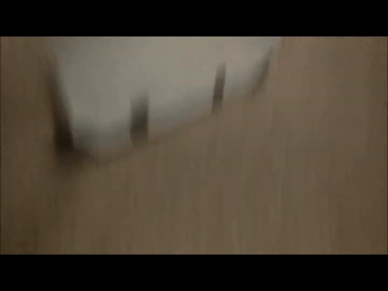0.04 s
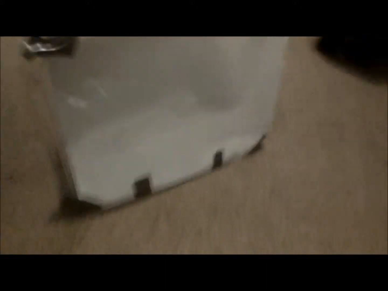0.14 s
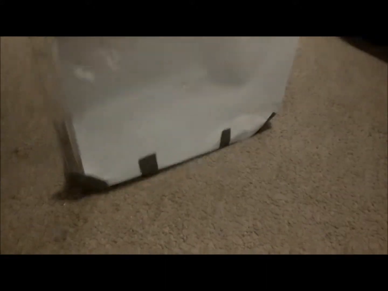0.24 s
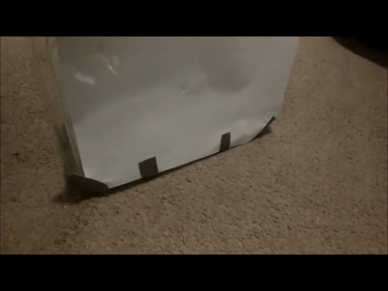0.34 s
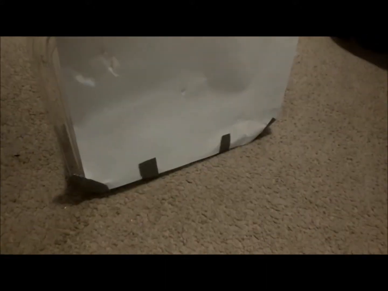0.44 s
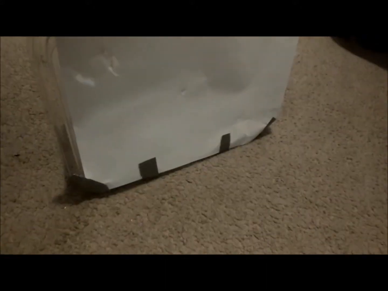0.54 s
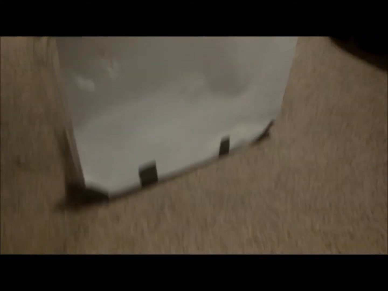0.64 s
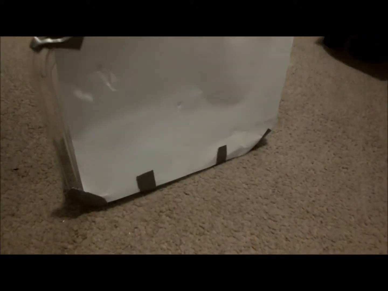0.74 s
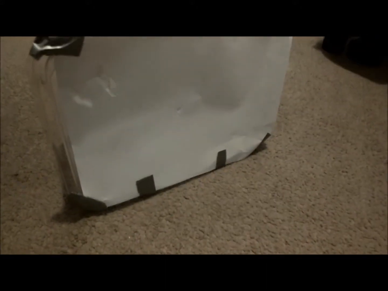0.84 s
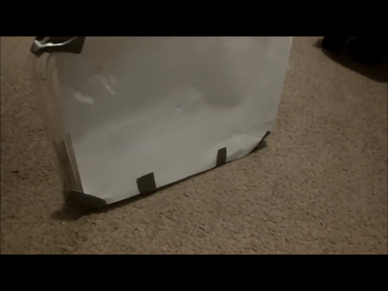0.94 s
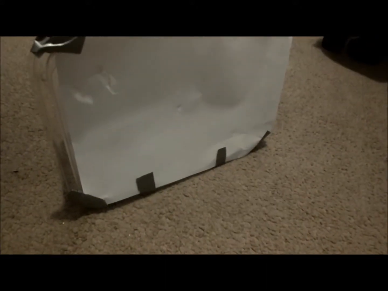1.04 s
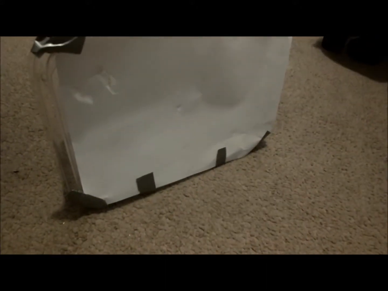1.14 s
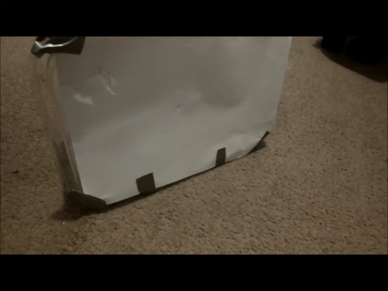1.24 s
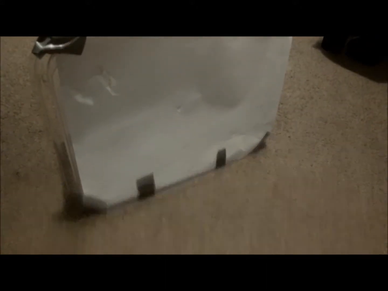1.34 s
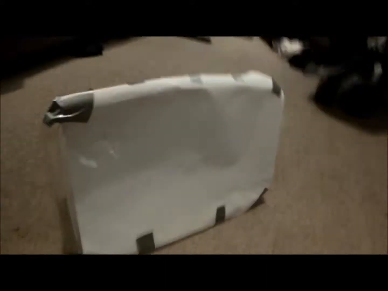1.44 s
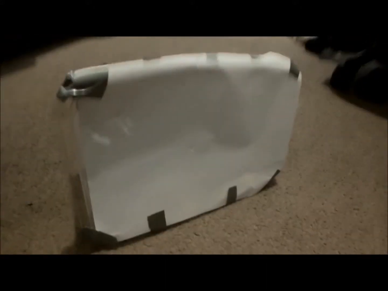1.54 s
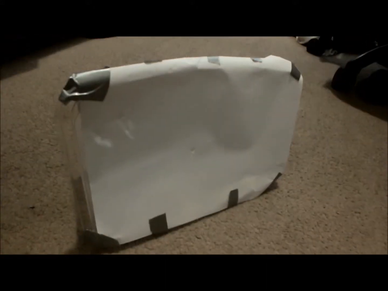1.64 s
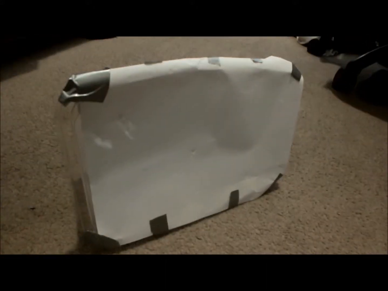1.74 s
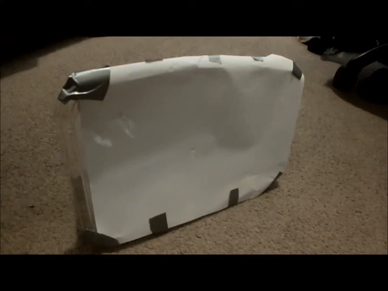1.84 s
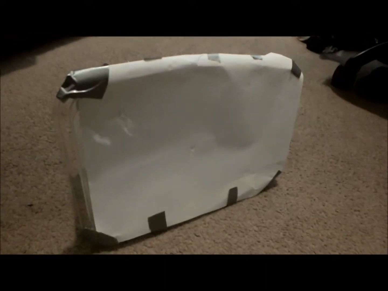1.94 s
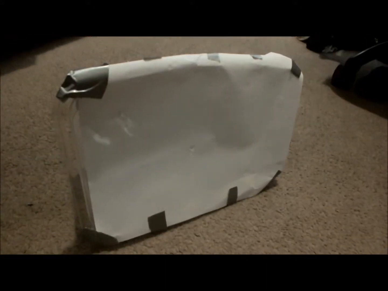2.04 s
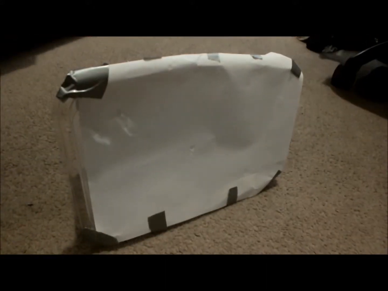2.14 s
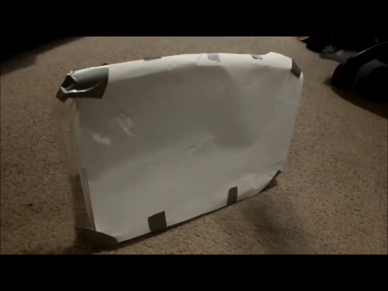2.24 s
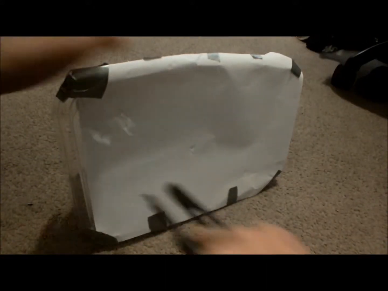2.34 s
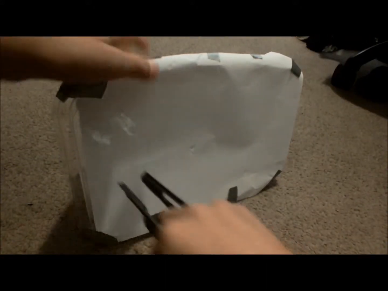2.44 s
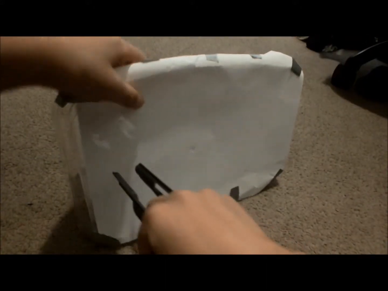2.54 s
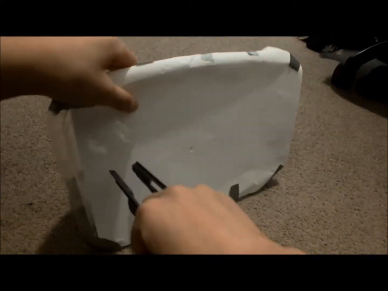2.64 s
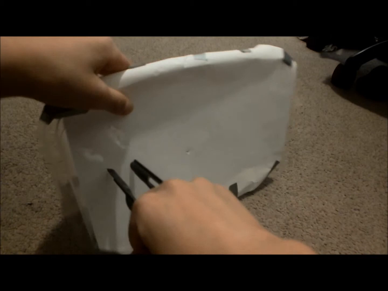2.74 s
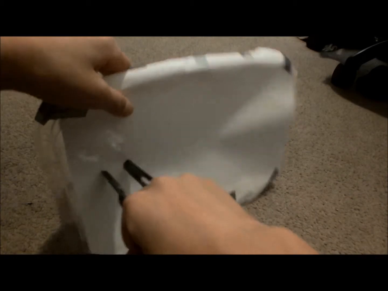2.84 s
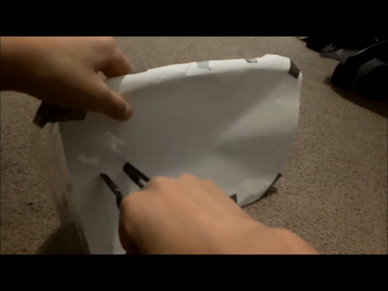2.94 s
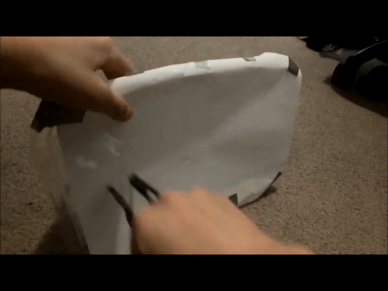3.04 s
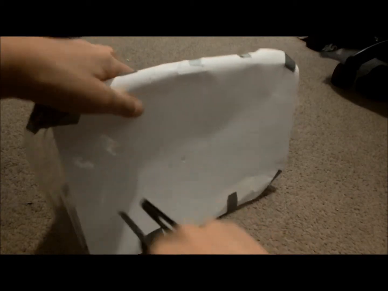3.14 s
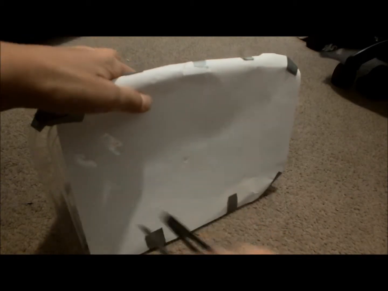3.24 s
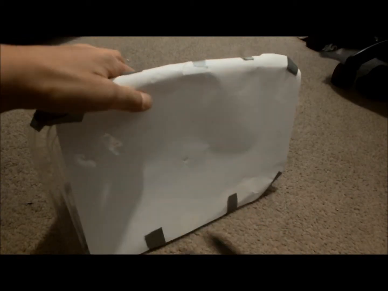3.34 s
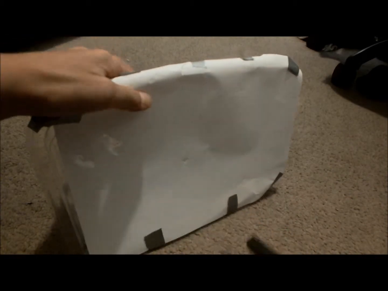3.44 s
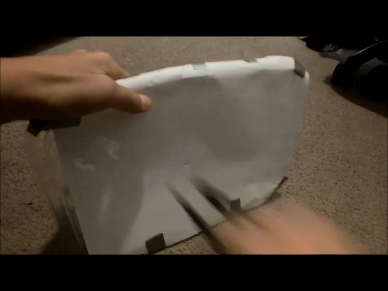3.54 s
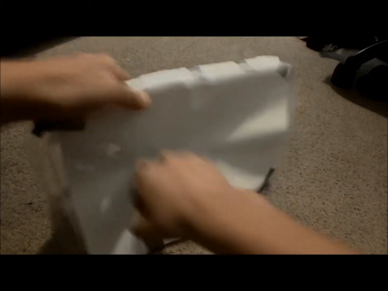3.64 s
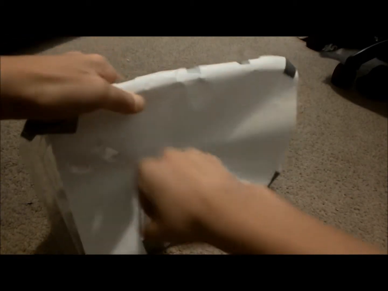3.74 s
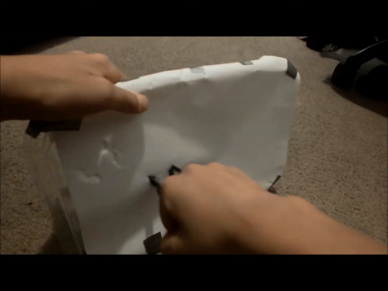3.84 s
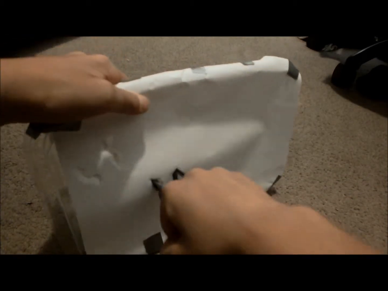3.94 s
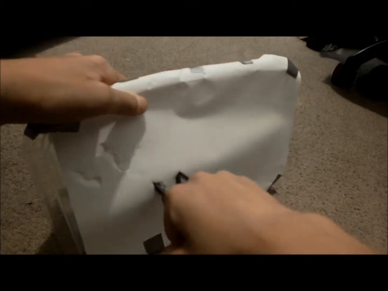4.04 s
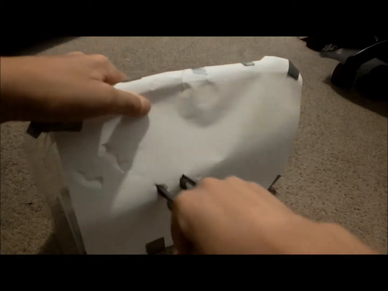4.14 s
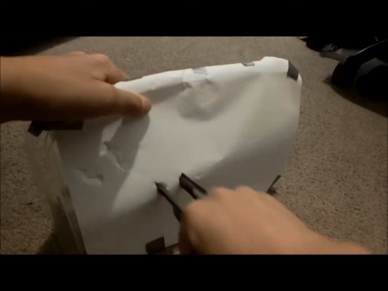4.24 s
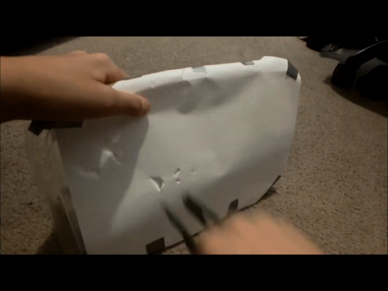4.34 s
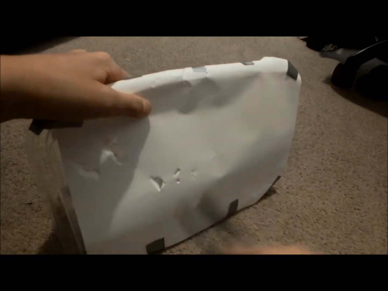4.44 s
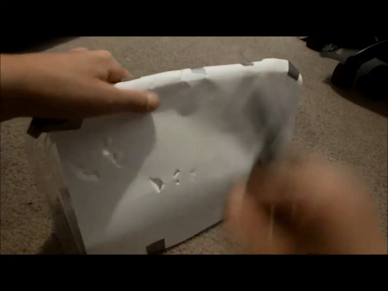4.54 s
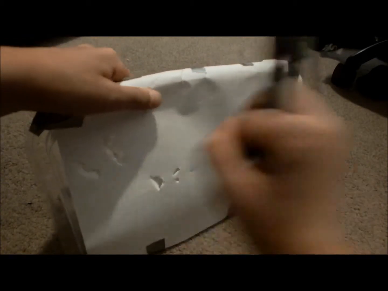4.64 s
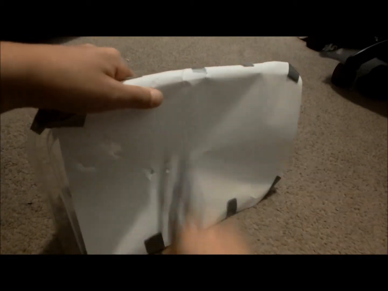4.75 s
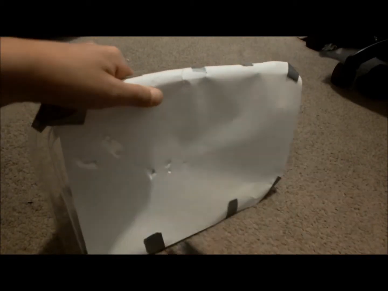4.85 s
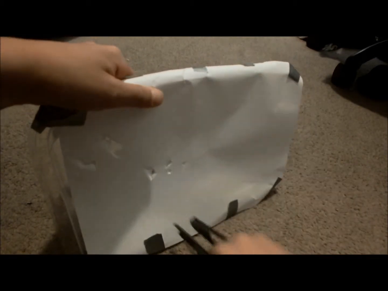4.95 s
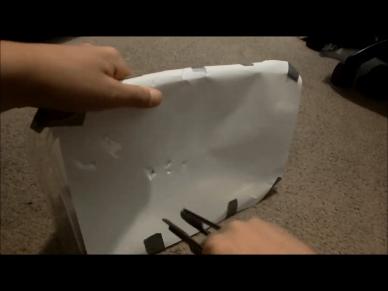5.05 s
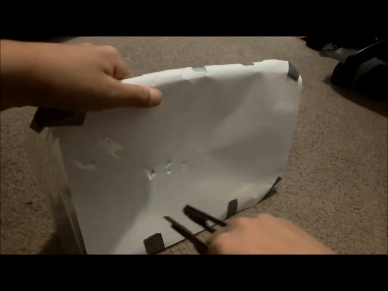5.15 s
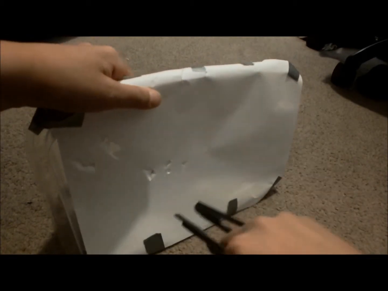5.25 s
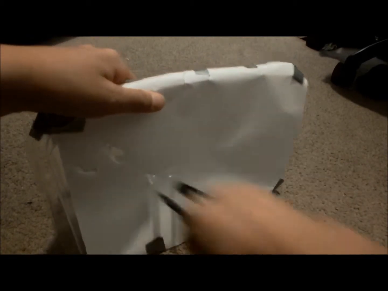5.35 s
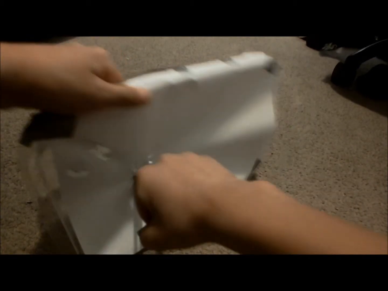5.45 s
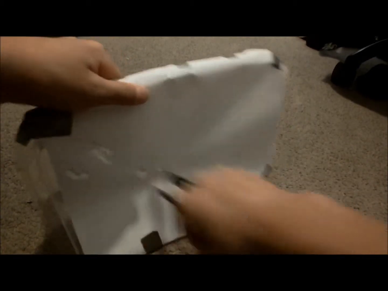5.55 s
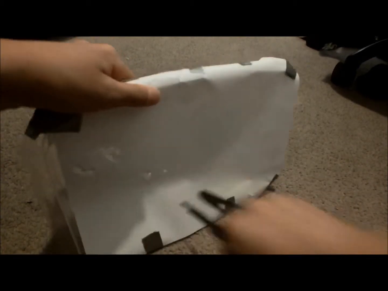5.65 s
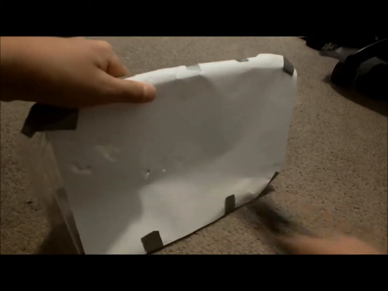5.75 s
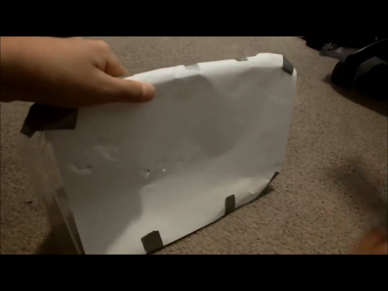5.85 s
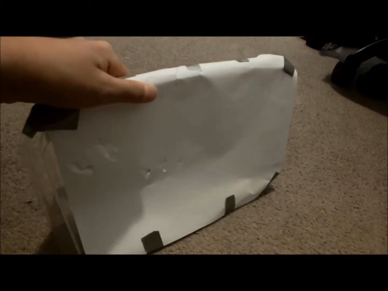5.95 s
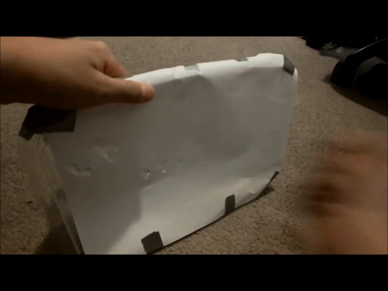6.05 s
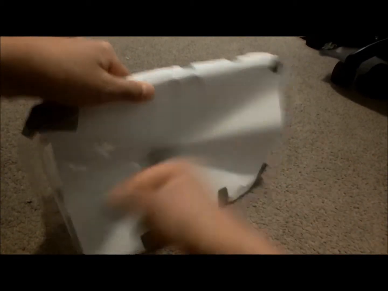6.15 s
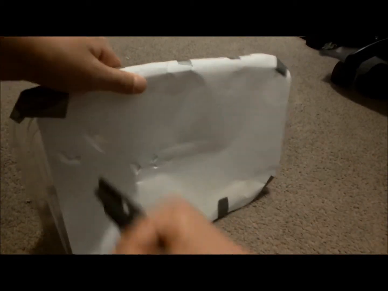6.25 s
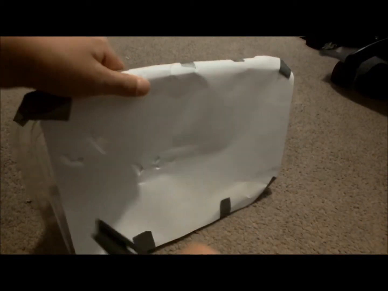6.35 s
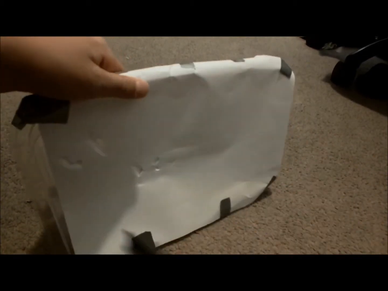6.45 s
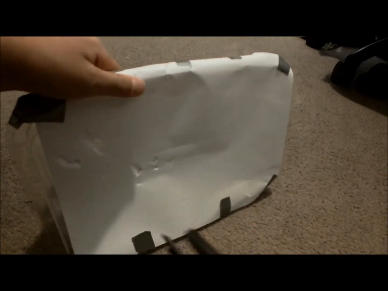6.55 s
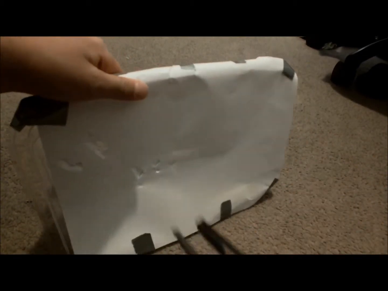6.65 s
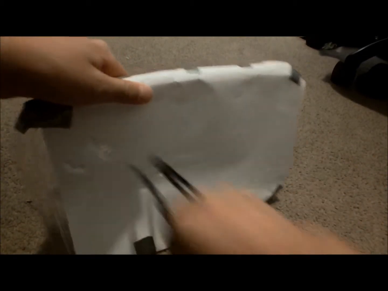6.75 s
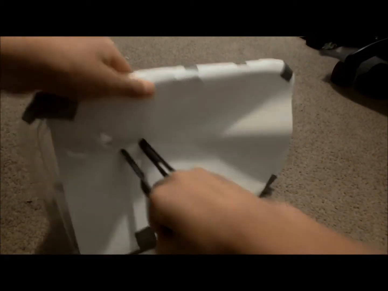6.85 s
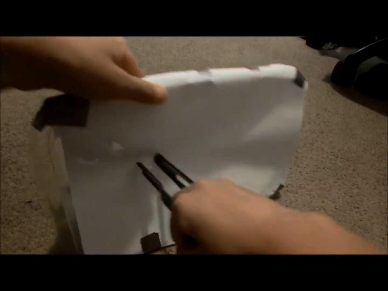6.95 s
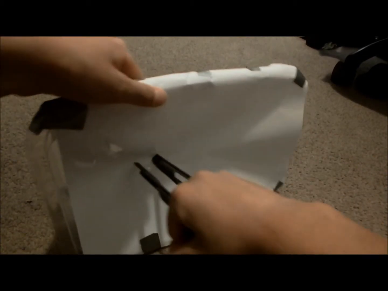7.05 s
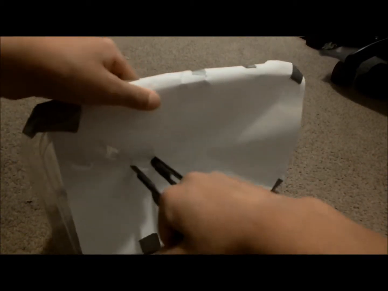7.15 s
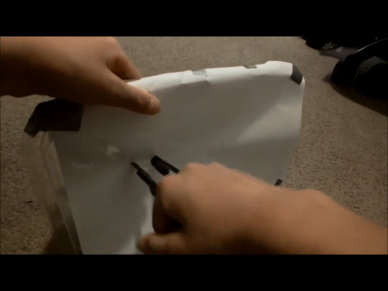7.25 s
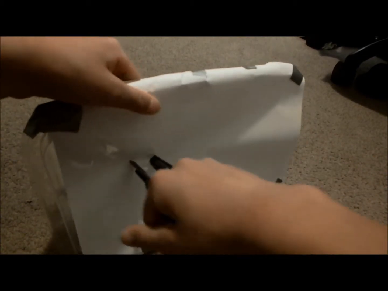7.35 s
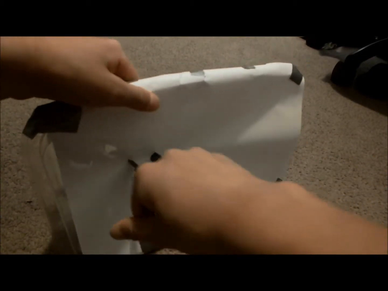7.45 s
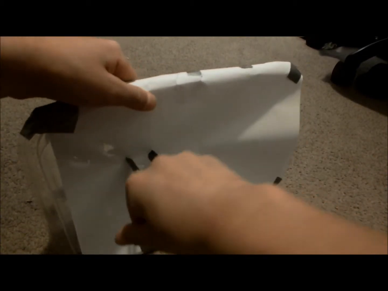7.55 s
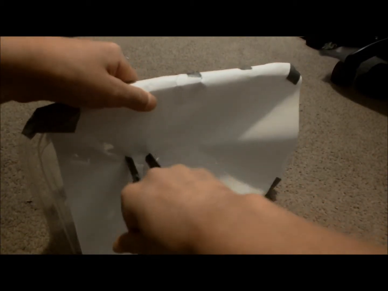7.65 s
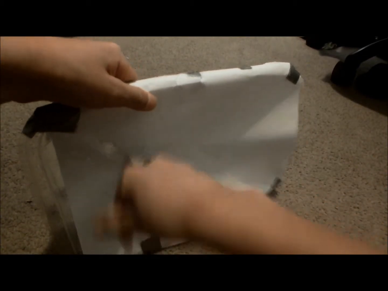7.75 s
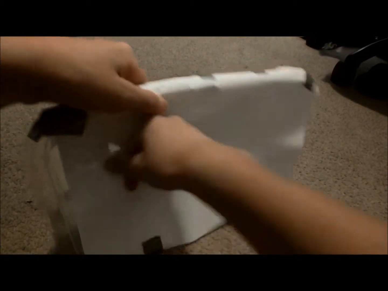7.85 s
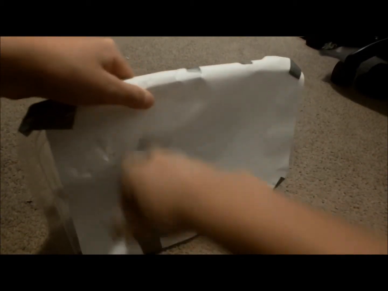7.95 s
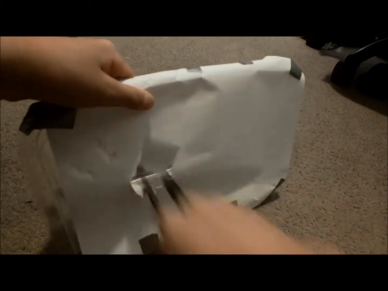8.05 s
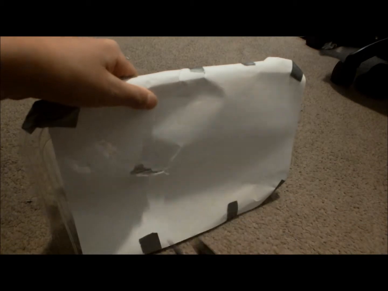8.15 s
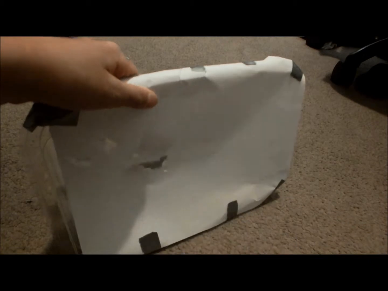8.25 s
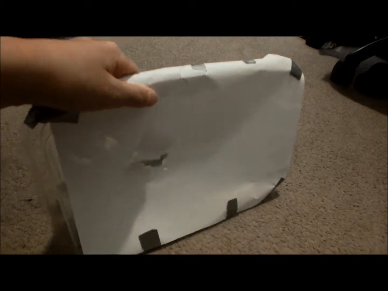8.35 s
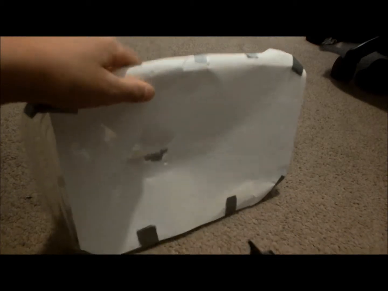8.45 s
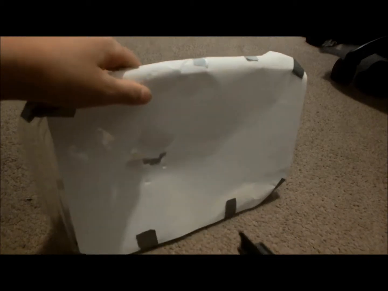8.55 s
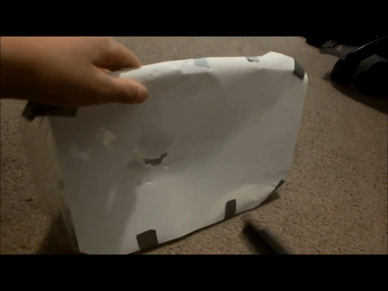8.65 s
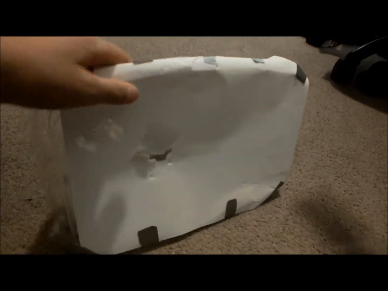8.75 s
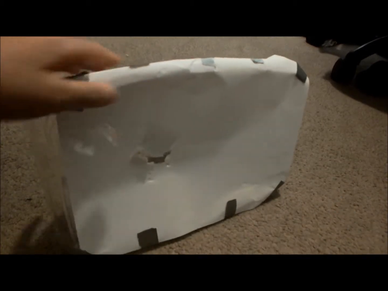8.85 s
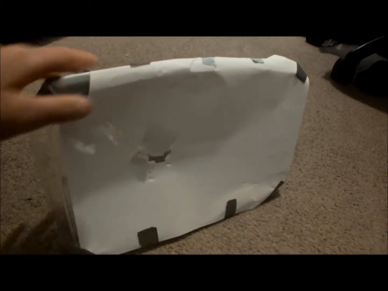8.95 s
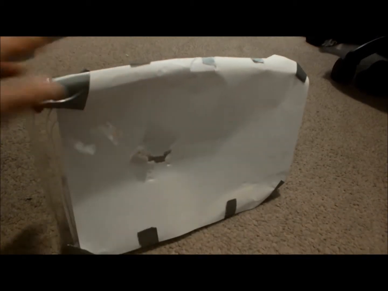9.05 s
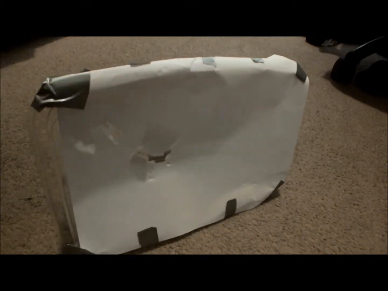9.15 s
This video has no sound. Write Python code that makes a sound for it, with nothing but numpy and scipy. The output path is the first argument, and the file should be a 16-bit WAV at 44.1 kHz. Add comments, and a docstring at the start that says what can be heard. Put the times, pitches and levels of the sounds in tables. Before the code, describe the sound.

Close, dry paper stabs: loud snapping punctures, short raspy tears and crinkles with a hollow boxy thump, after a few bumps on the camera.

```python
"""Toy blade stabbing a paper-covered box

A two-pronged toy blade stabs a sheet of paper taped over a hollow plastic box, close to a hand-held camera
in a carpeted room. Shaped pulses and noise snap as the taut sheet dents and bursts; random slips rasp as
fibres give way and the blade slides in and out; the sheet's sound rings the box modes.
Before that, pulses, ticks and damped thuds knock the camera about as it is set in place. Steady hiss below."""
import sys
import numpy as np
from scipy import signal
from scipy.fft import rfft, irfft, next_fast_len
from scipy.io import wavfile
from scipy.ndimage import uniform_filter1d

SR = 44100
rng = np.random.default_rng(int(sys.argv[2]) if len(sys.argv) > 2 else 0)


def put_to_file(sound):
    """Save the sound as 16-bit audio at rate SR, in the file named by the first command-line argument."""
    columns = np.atleast_2d(sound).T  # one column per channel
    safe = np.clip(columns, -1, 1)
    whole_steps = np.round(safe * 32767)
    wavfile.write(sys.argv[1], SR, whole_steps.astype(np.int16))


N = 406161
TIME_S = np.arange(N) / SR

# Colour of the steady hiss. Each row: frequency in Hz, relative level in dB.
HISS_COLOUR = [(15, -65), (25, -21), (76, -5.5), (102, -4), (190, 0.5), (394, -2.5), (516, -2.5), (624, -3),
               (1130, -6.5), (1940, -7.5), (3340, -9), (3620, -5), (4250, -11), (6380, -17.5), (16000, -27)]
# Narrow bands in the hiss. Each row: frequency in Hz, width in Hz, level in dB.
WHINE_BANDS = [(182.5, 5.1, -76), (2950, 250, -73), (3570, 61, -70), (6230, 180, -71), (6800, 200, -71.5),
               (7980, 120, -77)]
# Fingers shifting on the camera body. Each row: time in seconds, level in dB.
HANDLING_LEVEL = [(0, -66), (.04, -51), (.05, -33.5), (.11, -46), (.24, -56.5), (.36, -53.5), (1.36, -68),
                  (1.42, -59), (1.68, -60), (1.82, -50.5), (1.92, -62)]
# Colour of the skin ticks. Each row: frequency in Hz, relative level in dB.
GRIP_COLOUR = [(25, 1), (200, 3), (1200, -2.5), (3500, -9.5), (12000, -28)]
# Knocks and ticks on the camera body. Each row: start in seconds, level in dB, crest in Hz,
# slope going down from the crest in dB/octave, ring t60 in seconds.
KNOCKS = [(.0055, -32.5, 2220, 0, 0.038), (0.0419, -18, 1200, -6.5, 0.029), (.0927, -31, 2500, -0.5, 0.04),
          (.158, -42.5, 3000, -1, 0.038), (0.1805, -41, 3320, -6, 0.026), (0.2081, -35.5, 2650, -4, 0.031),
          (0.238, -36.5, 2900, 3.5, 0.03), (0.2893, -40, 865, 0.5, 0.042), (0.701, -32.5, 3850, -2, 0.017),
          (0.9265, -46, 1250, 2.5, 0.059), (1.3723, -17.5, 1550, -0.9, 0.037),
          (1.4491, -32, 5130, -3, 0.021), (1.4681, -41, 1030, -7, .05), (1.519, -36, 3540, -3, 0.045),
          (1.611, -43.5, 716, 3.5, 0.043)]
# Low modes each knock shakes in the camera body. Each row: frequency in Hz, t60 in seconds,
# level in dB relative to the knock.
CAMERA_MODES = [(51.5, 0.12, -15), (158, 0.093, -10.5)]
# Dull thuds of the hand on the camera and of the box as it rocks and springs back.
# Each row: start in seconds, level in dB, pitch in Hz, t60 in seconds.
THUDS = [(.27, -47.5, 211, .31), (.655, -46.5, 45, .35), (.69, -30, 241, 0.048), (1.72, -44, 281, 0.28),
         (1.743, -49, 133, 0.21), (1.813, -47, 284, .12), (1.825, -41.5, 142, 0.16),
         (2.553, -12.5, 302, 0.041), (3.635, -47, 46, 0.21), (3.64, -34, 137, 0.23),
         (4.34, -35, 230, 0.062), (5.469, -38, 102.5, .35), (6.261, -22.5, 264, 0.2),
         (6.848, -26, 131, 0.093), (7.628, -32, 192, 0.22), (8.306, -39, 116, 0.29),
         (8.486, -23.5, 272, 0.25), (8.497, -35, 106, 0.19), (8.497, -18, 572, 0.091)]
# Room decay. Each row: band centre in Hz, t60 in seconds, relative level in dB.
ROOM_BANDS = [(150, 0.47, 0.5), (403, 0.19, -4.5), (1000, 0.17, -2), (2500, 0.19, -1.5), (6000, 0.21, -4),
              (12000, 0.16, 2.5)]
# Air and wall modes of the box. Each row: frequency in Hz, t60 in seconds, level in dB before the box gain.
BOX_MODES = [(110, 0.15, -2.5), (189, 0.069, -3.5), (252.5, 0.055, 0.5), (288.8, 0.2, 5.5),
             (349, 0.081, -9), (416.4, 0.084, -0.5), (571, 0.1, -6.5), (685, 0.15, -9)]
# Sheet denting, buckling and springing back. Each row: start in seconds, level in dB, crest in Hz,
# slope going down from the crest in dB/octave, ring t60 in seconds.
SNAPS = [(2.4895, -32, 300, -4, 0.036), (2.517, -31, 600, -0.5, 0.038), (2.5512, -26, 450, -3, 0.045),
         (2.5829, -23.5, 2480, 1.5, 0.065), (2.7363, -20, 1900, -11.5, 0.012), (2.822, -29, 1890, 1, 0.047),
         (2.862, -25, 1700, -0.5, 0.045), (2.9212, -38.5, 2250, 2, 0.025), (3.3905, -42, 1300, 0, 0.059),
         (3.5641, -26, 1330, -2.5, 0.036), (3.7403, -32, 3600, 5, .033), (3.8082, -26, 2400, 1, 0.066),
         (3.819, -18, 3140, -2.5, 0.048), (3.9097, -22, 2980, 0.5, 0.049),
         (3.9735, -31.5, 2160, -3.5, 0.038), (3.9931, -29.5, 2300, 1.5, .018),
         (4.0827, -17, 3680, -6, 0.021), (4.1474, -24, 3900, 2.5, 0.096), (4.1627, -28, 2980, 3.5, 0.048),
         (4.4475, -42.5, 3000, 0.5, 0.034), (4.7204, -22.6, 4130, 0.5, 0.056),
         (4.7848, -19, 3800, -5, 0.049), (5.041, -33.5, 1970, 4, 0.041), (5.5768, -27.5, 2300, -1, 0.064),
         (5.6998, -36, 3120, 1, .03), (5.7463, -32, 1600, -0.5, 0.024), (5.8388, -28.5, 2170, -3.5, 0.042),
         (6.1932, -20, 4540, 5.5, 0.052), (6.2243, -17.5, 3380, -2, 0.075), (6.2464, -17, 2540, .5, 0.053),
         (6.904, -19, 2970, -2.7, 0.045), (6.9692, -18.5, 3700, -5.5, 0.021), (7.0874, -26, 2500, -4, .047),
         (7.1146, -19.5, 3100, -6, 0.024), (7.4176, -30.5, 2500, -1.5, 0.039),
         (7.5104, -24, 3140, 0.5, 0.046), (7.5664, -34.5, 1700, -1.5, 0.035),
         (7.941, -24.5, 1460, -4, 0.069), (8.226, -33, 3100, 1.5, 0.041), (8.2489, -31, 2200, 0, 0.087),
         (8.323, -42, 2800, 4, 0.035), (8.4222, -25.5, 503, -2.5, 0.065), (8.4715, -17, 2480, 3.5, 0.051)]
# Sheet splitting as the blade goes in or is wrenched out. Each row: start in seconds, level in dB,
# crest in Hz, slope going down from the crest in dB/octave, ring t60 in seconds.
BURSTS = [(3.6276, -11, 2600, 1, 0.046), (3.659, -22.5, 2020, -5, 0.049), (4.3676, -18.5, 6260, 0.5, 0.028),
          (4.7383, -14, 694, -4, 0.02), (5.3974, -13, 3450, -1, 0.059), (5.4963, -19, 5030, 1, 0.016),
          (6.1249, -11.5, 4900, 0.2, 0.039), (6.8008, -12, 3400, 0.5, 0.054),
          (7.6074, -12.5, 1320, -9, 0.027), (7.7784, -19, 4200, 4, 0.041), (8.1, -25, 3520, -2, 0.044),
          (8.4479, -16, 1900, 0.5, 0.054), (8.452, -18, 2500, -1, 0.041)]
# Rips, the blade cutting on. Each row: start in seconds, length in seconds, rasp in dB,
# sheet flexing in dB relative to rasp, fibre fizz in dB relative to rasp; all before the layer trims.
RIPS = [(2.488, .11, -41, 4, -9), (2.732, 0.037, -36.5, -9, -2.5), (2.818, 0.062, -33, 0, -19),
        (3.629, 0.11, -31.5, -3.5, 3.5), (3.737, 0.12, -36, -2, -10.5), (4.081, 0.029, -29, -14, -22),
        (4.16, 0.18, -25.5, -14.5, -7), (4.739, 0.14, -25.5, -8.5, -5), (5.397, 0.05, -25.5, -8, -1),
        (6.125, 0.11, -27, -5.5, -1), (6.798, 0.073, -25.5, -9.5, -3), (7.616, .025, -30, -3.5, -6.5),
        (7.78, 0.16, -29, -9.5, 1), (7.946, 0.061, -23, -10, -8), (8.024, 0.097, -30.5, -6, -8),
        (8.464, 0.054, -33.5, 1, -7.5)]
# Rubs, blade and holding hand sliding without cutting. Each row: middle in seconds, half length in seconds,
# rasp in dB, flexing in dB relative to rasp, fizz in dB relative to rasp; all before the layer trims.
RUBS = [(2.842, 0.19, -44.5, -0.5, -10), (3.096, 0.061, -44.5, 0, -1.5), (3.183, 0.032, -46, 5, -5),
        (3.32, 0.15, -53, 1, -4.5), (3.57, 0.082, -42.5, -4.5, -11), (4.04, 0.2, -45.5, 5, -14.5),
        (4.347, 0.035, -40, 4.5, -18), (4.49, 0.069, -47.5, -12, -1.5), (4.565, 0.036, -42, -2, 0.5),
        (5.368, 0.054, -42.5, -5.5, -4), (5.473, 0.043, -36, 5.5, -1.5), (5.582, 0.075, -38.5, -1.5, -7),
        (5.77, 0.043, -40, -3.5, -9), (6.28, 0.042, -42.5, 8, -13), (6.654, 0.052, -52, -11, -7),
        (6.773, 0.038, -44, -14, -6.5), (6.967, 0.046, -37.5, -1.5, -4), (7.136, 0.081, -46.5, -6, -2.5),
        (7.493, 0.19, -54, -5.5, -2.5), (7.758, 0.12, -46, -13, -4), (8.271, 0.038, -46.5, 7.5, -20),
        (8.77, 0.068, -56.5, -6, -2.5)]
# Colours of the tearing layers. Each row: frequency in Hz, relative level in dB.
RASP_COLOUR = [(500, -30.5), (900, -12), (1250, 2), (1600, 5), (2300, 4.5), (3200, 0.5), (4300, -11),
               (5500, -18.5), (9000, -43.5)]
FLEX_COLOUR = [(30, -33), (75, -22), (110, -6.5), (200, -7.5), (290, -5), (480, 2), (750, -1.5),
               (1100, -4.5), (2000, -40.5)]
FIZZ_COLOUR = [(2800, -25.5), (4000, 5.5), (4900, 5), (6500, 2), (8200, -2), (9800, -7), (13000, -11),
               (16000, -12)]
CRACKLE_COLOUR = [(150, -40), (500, 3.5), (1200, -1.5), (2500, 13), (5000, -2), (9000, -18), (16000, -58)]
# Side relative to mid at the microphone pair. Each row: frequency in Hz, level in dB.
WIDTH = [(50, -8), (150, -20), (350, -21.5), (700, -16), (1300, -11.5), (2400, -5), (4400, -1.5),
         (10000, -0.5)]
# Left minus right. Each row: frequency in Hz, difference in dB.
BALANCE = [(40, 4), (130, 1.3), (500, 0.9), (1000, 1.5), (2000, -1.2), (4000, 2), (8000, 1.5), (16000, 1)]

HISS_DB = -53
RIP_ATTACK_S, RIP_T60_S, FLEX_T60_S = 0.002, 0.1, 0.18
FLEX_GROWTH_DB, FIZZ_SAG_DB = 5, 4.5  # over one rip: the sheet bends more and fizzes less as the blade slows
TREBLE_HZ = 12000  # where a hit's treble fall is specified
TOP_HZ, CEILING = 15900, 0.85  # upper band limit, peak amplitude before the band limit


def undb(db):
    """Decibels to gain."""
    return 10 ** (np.asarray(db) / 20)


def unit(x):
    """Scale to rms 1."""
    return x / np.sqrt(np.mean(x ** 2) + 1e-20)


def bins(size):
    """Frequencies in Hz of a real spectrum, floored at 1."""
    return np.maximum(np.arange(size // 2 + 1) * SR / size, 1)


def along(points, hz):
    """Read (Hz, value) points on a log-frequency axis."""
    point_hz, value = np.transpose(points)
    return np.interp(np.log(hz), np.log(point_hz), value)


def colour(x, points):
    """Minimum-phase filter by (Hz, dB) points: no ringing ahead of an attack."""
    size = 2 * next_fast_len(x.shape[-1] // 2 + 2048)
    cepstrum = irfft(np.log(undb(along(points, bins(size)))))
    # fold onto positive time
    cepstrum[1:size // 2] *= 2
    cepstrum[size // 2 + 1:] = 0
    response = np.exp(rfft(cepstrum))
    return irfft(rfft(x, size) * response)[..., :x.shape[-1]]


def fade(t, t60_s):
    """Exponential decay, 60 dB in t60_s."""
    return np.exp(-np.log(1000) * t / max(t60_s, 1e-3))


def walk(rate_hz):
    """Smooth random wander of spread near 1."""
    step = max(int(SR / rate_hz), 1)
    held = np.repeat(rng.standard_normal(N // step + 1), step)
    return unit(uniform_filter1d(held, step)[:N])


def add(track, start_s, sound):
    """Mix a sound in at start_s."""
    i = max(int(start_s * SR), 0)
    track[..., i:i + sound.shape[-1]] += sound[..., :N - i]


def ports(pair):
    """Mid and side to left and right: low sound reaches both ports nearly alike, treble differs."""
    mid, side = pair[0], colour(pair[1], WIDTH)
    return np.array([mid + side, mid - side])


def grains(rate_hz, spread_db):
    """Tiny slips at random moments, many weak and a few strong; mid and side."""
    occurs = rng.random(N) < rate_hz / SR
    sizes = occurs * undb(spread_db * np.minimum(rng.exponential(size=N), 5))
    return sizes * np.array([rng.choice([-1, 1], N), rng.standard_normal(N)])


def hiss(trim_db, waver_db):
    """Steady quiet noise with a few narrow, whining bands, unrelated left and right."""
    level_db = HISS_DB + trim_db + waver_db * walk(3.3)
    broad = unit(colour(rng.standard_normal((2, N)), HISS_COLOUR)) * undb(level_db)
    size = 2 * next_fast_len(N // 2 + 1)
    power = 0
    for hz, width_hz, db in WHINE_BANDS:
        peak = 1 / (1 + (2 * (bins(size) - hz) / width_hz) ** 2) ** 2
        power = power + undb(db) ** 2 * peak / peak.mean()
    noise = rfft(rng.standard_normal((2, size)))
    whine = irfft(noise * np.sqrt(power))[:, :N]
    return broad + whine


def room(x, wet_db, gap_s):
    """A short, carpeted room: scattered echoes that thicken into a tail, each band with its own decay."""
    t = TIME_S[:SR // 2]
    echoes = rng.standard_normal((2, len(t))) * undb(2 * rng.standard_normal(len(t)))
    spectrum, tail = rfft(unit(echoes), len(t)), 0
    centres_hz = [row[0] for row in ROOM_BANDS]
    for share, (hz, t60_s, db) in zip(np.eye(len(ROOM_BANDS)), ROOM_BANDS):
        weight = along(np.transpose([centres_hz, share]), bins(len(t)))
        tail = tail + undb(db) * irfft(spectrum * weight, len(t)) * fade(t, t60_s)
    # silent for gap_s, then up to full over another gap_s
    tail = ports(tail * np.clip(t / gap_s - 1, 0, 1))
    tail /= np.sqrt(np.sum(tail ** 2) / 2)
    return undb(wet_db) * signal.fftconvolve(x.mean(0)[None], tail, axes=1)[:, :N]


def handling(rate_hz, spread_db):
    """Skin creaks on the camera shell in small, dull ticks."""
    time_s, db = np.transpose(HANDLING_LEVEL)
    ticks = unit(ports(colour(grains(rate_hz, spread_db), GRIP_COLOUR)))
    return ticks * undb(np.interp(TIME_S, time_s, db, right=-120))


def thuds(rise_s, rough):
    """Heavily damped sines with dull noise, plus the body modes shaken by each camera knock."""
    out, t = np.zeros((2, N)), TIME_S[:SR // 2]
    shakes = [(start_s, db + mode_db, hz, t60_s)
              for start_s, db, *_ in KNOCKS for hz, t60_s, mode_db in CAMERA_MODES]
    for start_s, db, hz, t60_s in THUDS + shakes:
        dull = [(hz / 4, -24), (hz, 0), (hz * 2, -14), (hz * 8, -60)]
        pair = rough * unit(colour(rng.standard_normal((2, len(t))), dull))
        pair[0] += np.sin(2 * np.pi * hz * t)
        envelope = fade(t, t60_s) * (1 - np.exp(-t / rise_s))
        add(out, start_s, undb(db) * pair * envelope)
    return ports(out)


def hits(table, crack_db, grit_db, bass_db, treble_db):
    """A sharp pulse, then a short crinkly ring; above its crest it falls to treble_db at TREBLE_HZ."""
    out, t = np.zeros((2, N)), TIME_S[:4096]
    attack = int(0.01 * SR)
    octaves = np.array([-5, -2, 0, 5])
    for start_s, db, crest_hz, below, t60_s in table:
        above = treble_db / np.log2(TREBLE_HZ / crest_hz)  # dB/octave
        grit = undb(grit_db * np.repeat(rng.standard_normal(len(t) // 32), 32))
        # longer rings hold for a moment before they die away
        hold_s = max(t60_s - 0.03, 0) * 0.27
        pair = rng.standard_normal((2, len(t))) * grit * fade(np.maximum(t - hold_s, 0), t60_s)
        pair /= np.sqrt(np.sum(pair[0] ** 2))
        # a short ring means a clean buckle: stronger first pulse
        pair[0, 0] -= undb(crack_db) * (0.033 / max(t60_s, 0.01)) ** 1.02
        shape_db = [below * 2 + bass_db, below * 2, 0, above * 5]
        sound = ports(colour(pair, np.transpose([crest_hz * 2. ** octaves, shape_db])))
        # level is the rms of the first 10 ms
        add(out, start_s, sound * undb(db) / np.sqrt(np.mean(sound[:, :attack] ** 2)))
    return out


def box(sheet, gain_db):
    """The sheet drives the hollow box, whose low modes ring on after it."""
    t = TIME_S[:SR // 2]
    ring = 0
    for hz, t60_s, db in BOX_MODES:
        decay = fade(t, t60_s)
        ring = ring + undb(db) * np.cos(2 * np.pi * hz * t) * decay / np.sum(decay) * 2
    return undb(gain_db) * signal.fftconvolve(sheet, ring[None], axes=1)[:, :N]


def strokes():
    """Levels in dB of rasp, flexing and fizz: a rip starts at once, holds and dies; a rub swells and fades."""
    power, t = np.zeros((3, N)), TIME_S[:SR]
    for start_s, length_s, db, flex_db, fizz_db in RIPS:
        attack = np.minimum(t / RIP_ATTACK_S, 1)
        after_s = np.maximum(t - length_s, 0)
        progress = np.minimum(t / length_s, 1) - 0.5
        rasp = fade(after_s, RIP_T60_S)
        flex = fade(after_s, FLEX_T60_S) * undb(flex_db + FLEX_GROWTH_DB * progress)
        fizz = rasp * undb(fizz_db - FIZZ_SAG_DB * progress)
        add(power, start_s, (undb(db) * attack * np.array([rasp, flex, fizz])) ** 2)
    for middle_s, half_length_s, db, flex_db, fizz_db in RUBS:
        swell = np.exp(-((t - 0.5) / half_length_s) ** 2)
        gains = undb([db, db + flex_db, db + fizz_db])
        add(power, middle_s - 0.5, np.outer(gains, swell) ** 2)
    return 10 * np.log10(power + 1e-12)


def shifting(x, rate_hz, depth_db):
    """As the tear moves, the sheet favours now one band and now another."""
    size = 2 * next_fast_len(N // 2 + 1)
    spectrum, centres_hz = rfft(x, size), np.geomspace(400, 6400, 13)
    out = 0
    for share in np.eye(len(centres_hz)):
        weight = along(np.transpose([centres_hz, share]), bins(size))
        band = irfft(spectrum * weight)[:, :N]
        out = out + band * undb(depth_db * walk(rate_hz))
    return out


def drag(rasp_trim_db, fizz_trim_db, flex_trim_db, crackle_db, crackle_t60_s):
    """Fibres catch and let go on the blade: the sheet rasps, flexes and fizzes in uneven spurts."""
    rasp_db, flex_db, fizz_db = strokes()
    slips = shifting(grains(rate_hz=4000, spread_db=0.5), rate_hz=40, depth_db=2.5)
    slips = slips * undb(1.07 * walk(140))
    folds = grains(rate_hz=1200, spread_db=1.5) * undb(1.5 * walk(60))
    # now and then a whole bundle of fibres parts with a tiny crack
    bundles = np.abs(grains(rate_hz=110, spread_db=3.0)[0])
    crack_envelope = signal.fftconvolve(bundles, fade(TIME_S[:SR // 20], crackle_t60_s))[:N]
    cracks = rng.standard_normal((2, N)) * crack_envelope
    layers = ((slips, RASP_COLOUR, rasp_db + rasp_trim_db),
              (slips, FIZZ_COLOUR, fizz_db + fizz_trim_db),
              (folds, FLEX_COLOUR, flex_db + flex_trim_db),
              (cracks, CRACKLE_COLOUR, rasp_db + crackle_db))
    return sum(unit(ports(colour(source, points))) * undb(db) for source, points, db in layers)


def scene():
    """Hiss, camera handling, and paper over its box, with room echoes."""
    background = hiss(trim_db=0, waver_db=1.75)
    knocks = hits(KNOCKS, crack_db=-5.5, grit_db=-3.0, bass_db=-20.0, treble_db=-27.5)
    camera = knocks + handling(rate_hz=1200, spread_db=3.0)
    dull_thuds = thuds(rise_s=0.003, rough=0.78)
    bursts = hits(BURSTS, crack_db=-5.5, grit_db=1, bass_db=-8, treble_db=-25.5)
    snaps = hits(SNAPS, crack_db=-7, grit_db=2, bass_db=-16, treble_db=-40)
    tearing = drag(rasp_trim_db=-1.5, fizz_trim_db=0, flex_trim_db=-0.5, crackle_db=-5.0, crackle_t60_s=0.02)
    sheet = bursts + snaps + tearing
    paper = sheet + box(sheet, gain_db=0.5)
    echoes = room(paper, wet_db=-14, gap_s=0.0045) + room(knocks, wet_db=-14.5, gap_s=0.0092)
    return background + camera + dull_thuds + echoes + paper


def record(dry):
    """Left is a little louder in most bands; the highest peaks are rounded and the top is cut."""
    tilted = np.array([colour(channel, [(hz, sign * db / 2) for hz, db in BALANCE])
                       for channel, sign in zip(dry, (1, -1))])
    rounded = tilted / (1 + (tilted / CEILING) ** 4) ** 0.25
    low_pass = signal.ellip(10, 0.2, 70, TOP_HZ, fs=SR, output="sos")
    return signal.sosfilt(low_pass, rounded)


dry = scene()
out = record(dry)
put_to_file(out)
```